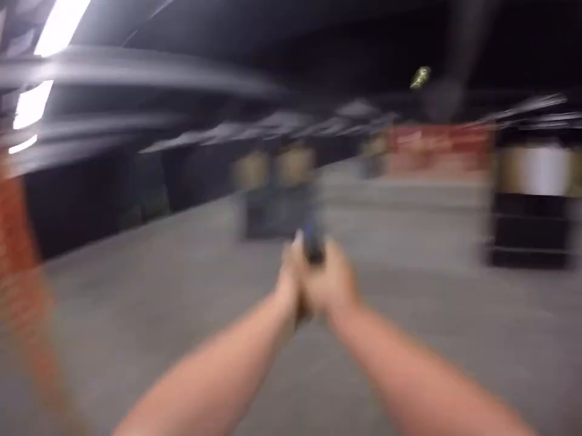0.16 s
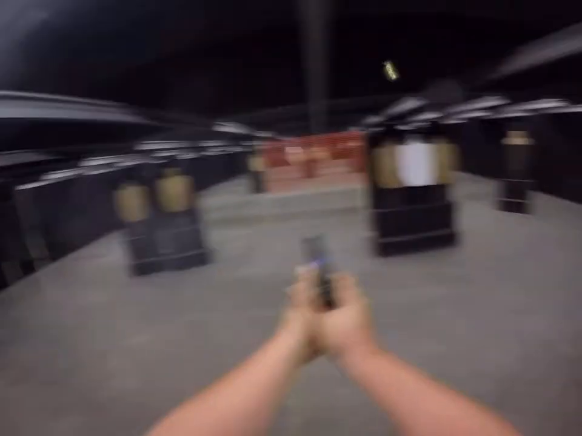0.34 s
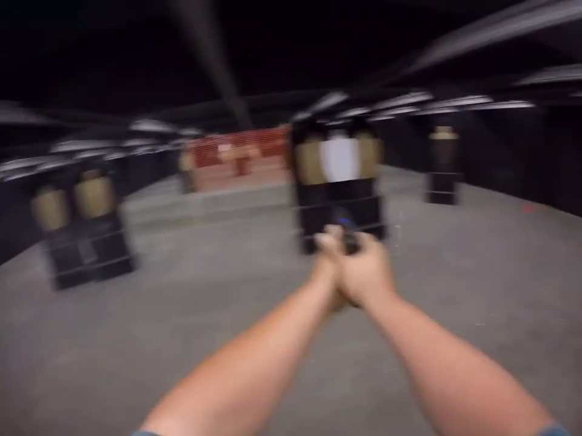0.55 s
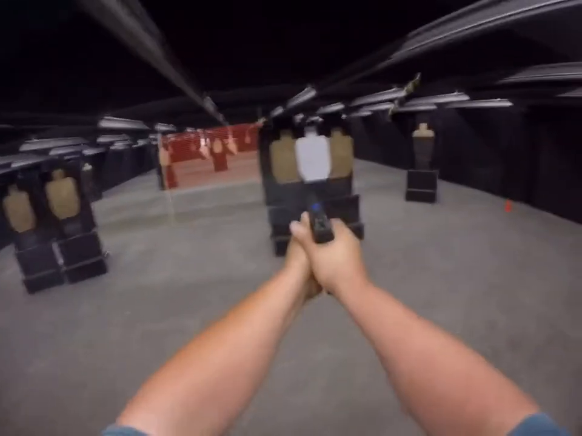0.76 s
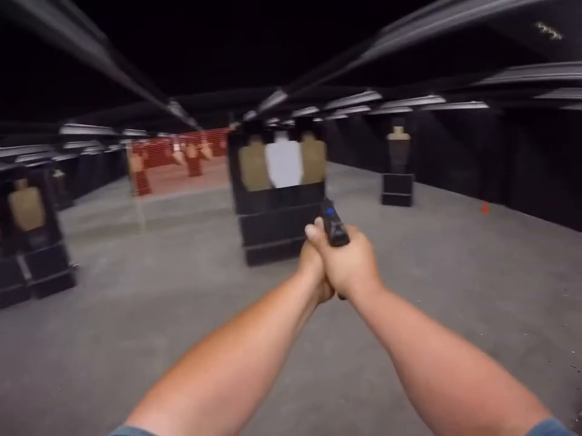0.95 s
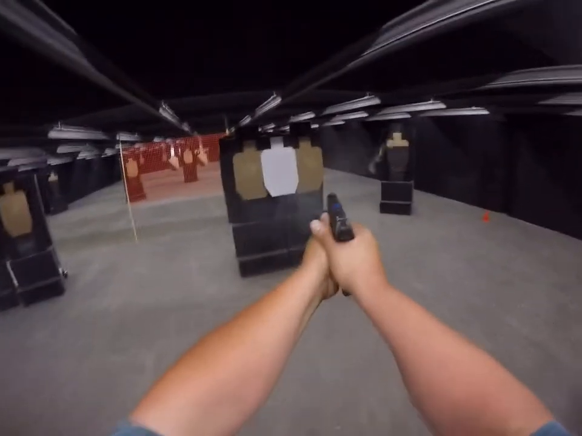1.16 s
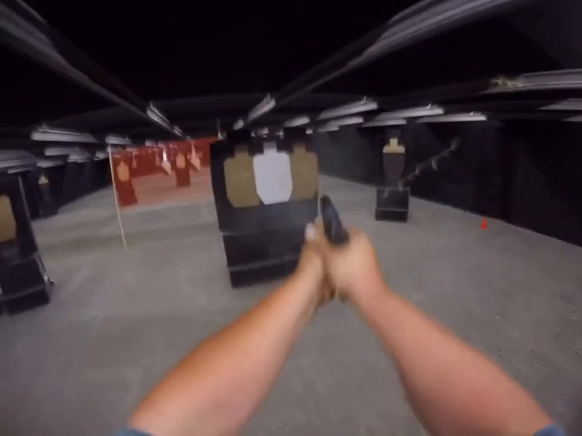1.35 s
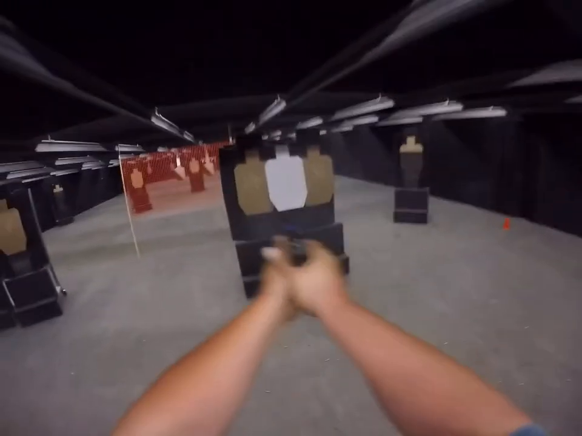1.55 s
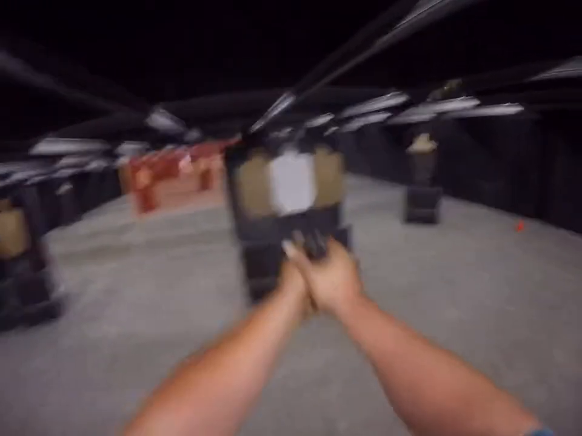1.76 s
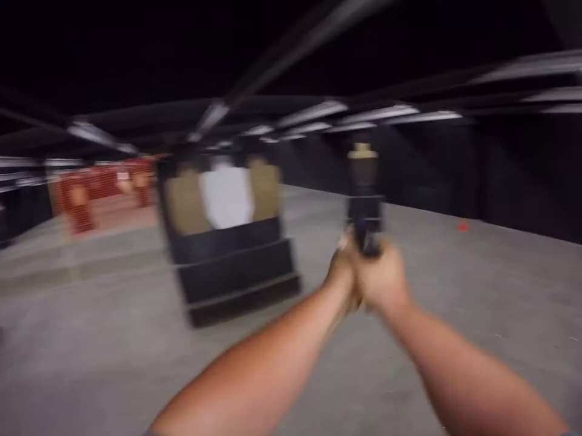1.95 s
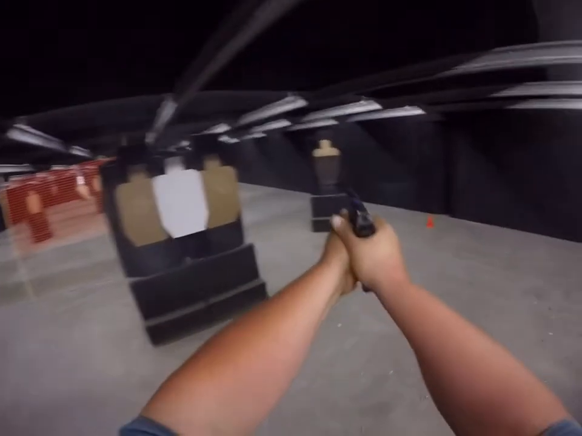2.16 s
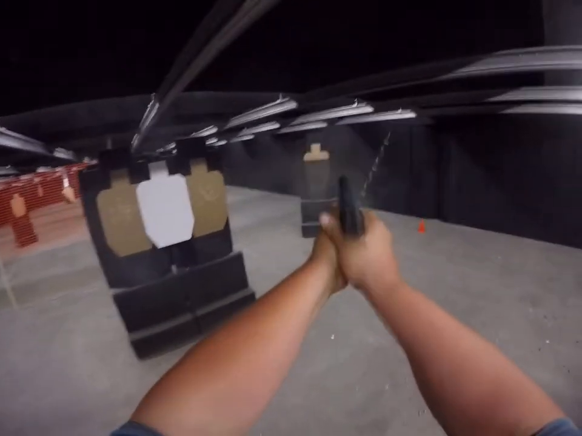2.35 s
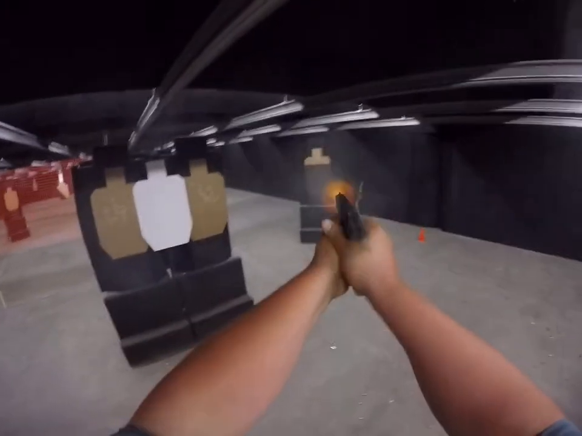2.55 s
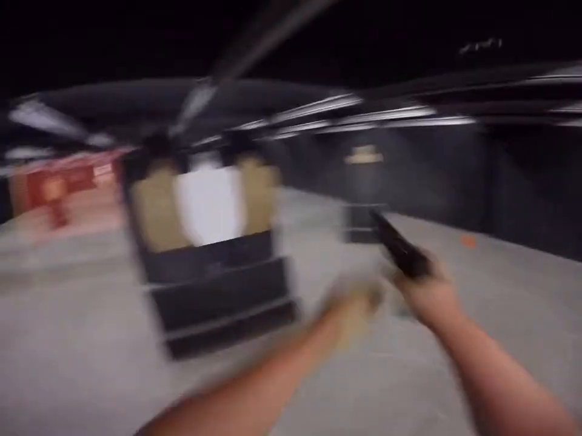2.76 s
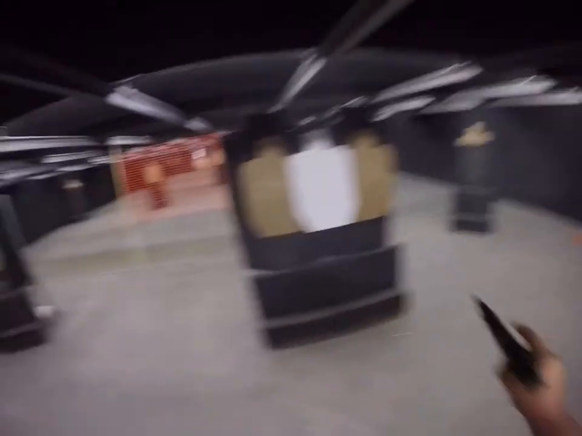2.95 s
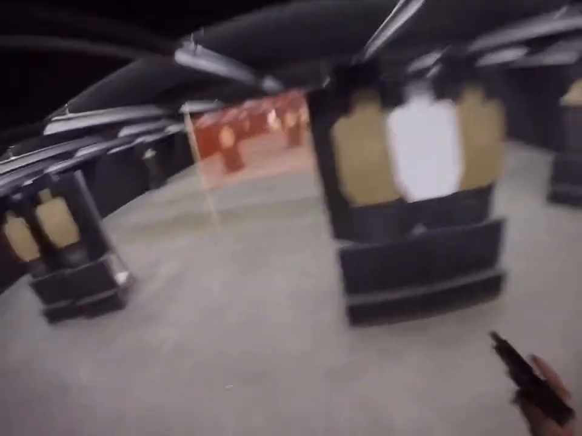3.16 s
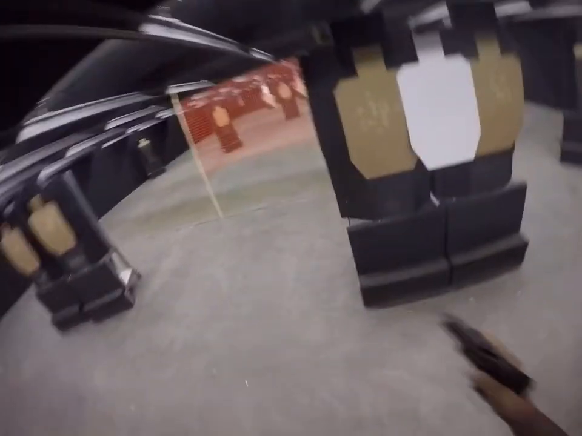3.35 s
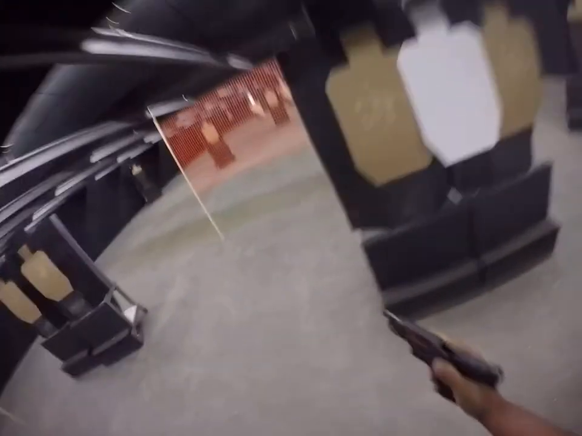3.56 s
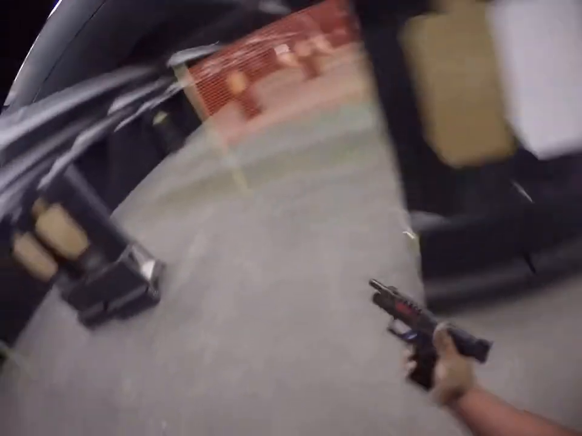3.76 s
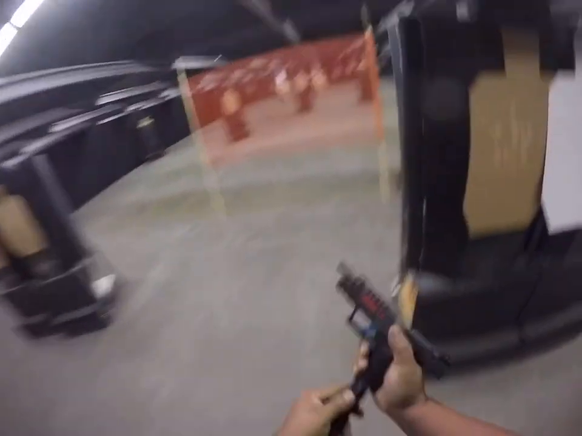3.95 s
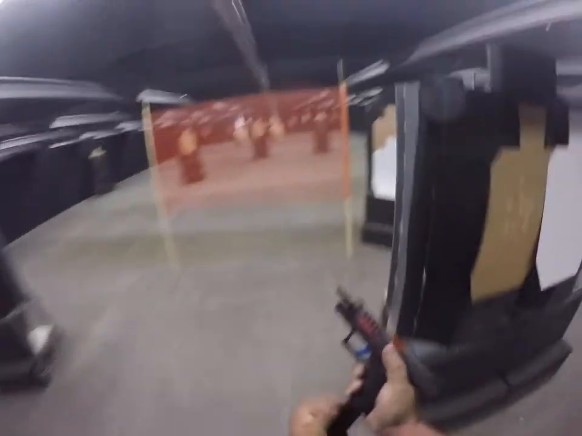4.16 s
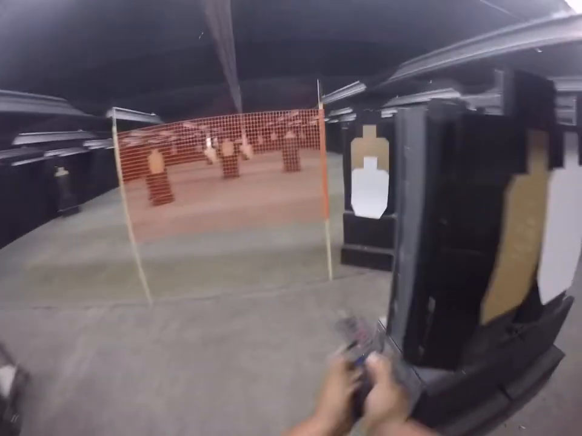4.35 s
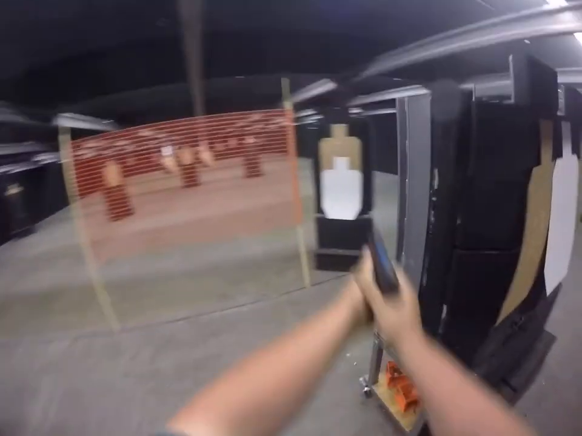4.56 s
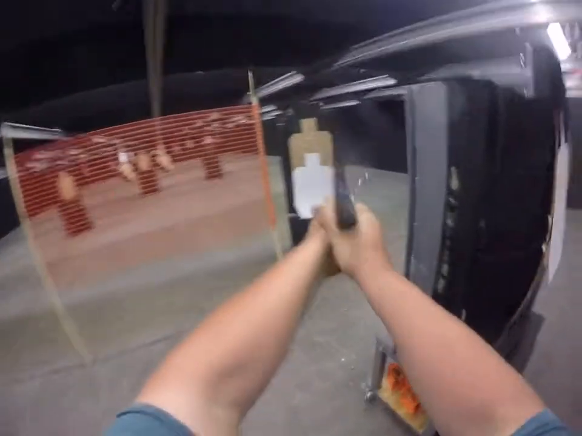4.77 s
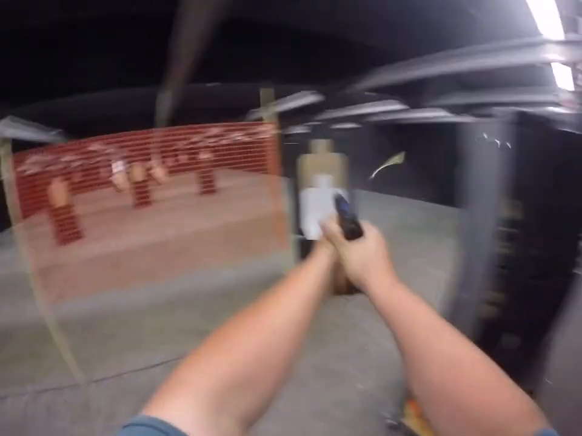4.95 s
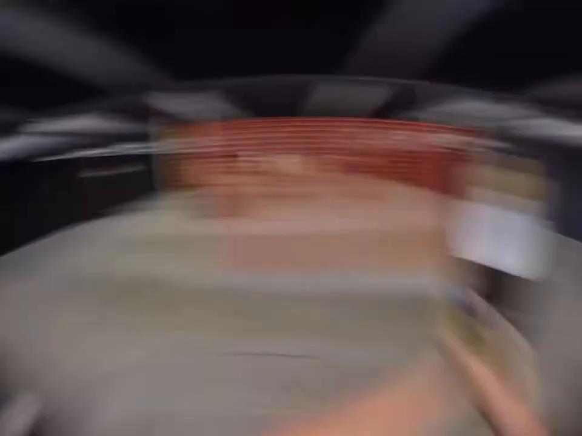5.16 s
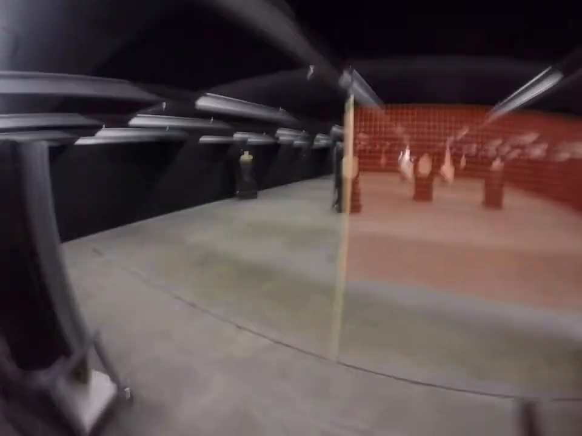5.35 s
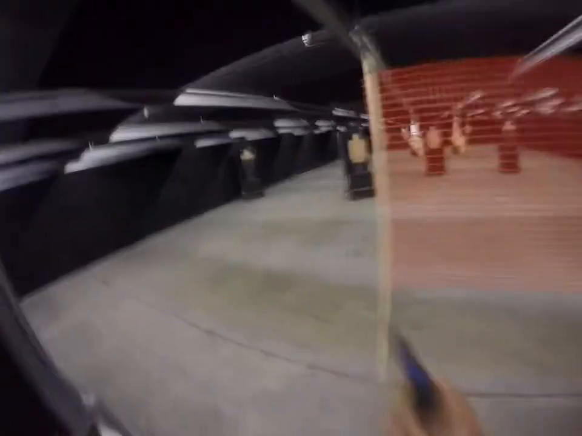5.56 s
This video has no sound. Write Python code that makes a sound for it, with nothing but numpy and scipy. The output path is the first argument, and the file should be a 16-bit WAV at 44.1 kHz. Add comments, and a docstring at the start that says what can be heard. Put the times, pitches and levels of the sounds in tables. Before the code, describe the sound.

Nine overloaded pistol shots crack in uneven strings through a concrete indoor range, broken by a quick clacking magazine change.

```python
"""A pistol is fired in quick strings in an indoor range, heard from a camera worn by the shooter.
Each blast is a noise crack, ringing housing modes and a low thud; decaying noise bands make the concrete hall.
The reload is noise blows and scrapes through steel resonances: a magazine drops and bounces, a new one goes in,
the slide closes. Spent brass rings in paired modes; filtered noise makes ventilation and buffeting.
The microphone overloads and flattens the peaks."""
import sys
import numpy as np
from scipy import signal
from scipy.fft import rfft, irfft, next_fast_len
from scipy.io import wavfile

SR = 44100
rng = np.random.default_rng(int(sys.argv[2]) if len(sys.argv) > 2 else 0)


def waveform_to_disk(signal):
    """Save audio, clipped to [-1, 1], as 16-bit WAV at the path in sys.argv[1]."""
    frames = np.transpose(np.atleast_2d(signal))
    scaled = np.clip(frames, -1, 1) * 32767
    samples = np.round(scaled).astype(np.int16)
    wavfile.write(sys.argv[1], SR, samples)


N = 247401
TIME_S = np.arange(N) / SR
ONE_SECOND = TIME_S[:SR]

# Steel contacts of trigger, magazine and slide.
# Each row: start in seconds, relative snap level in dB, edge click relative to the snap in dB.
CONTACTS = [(2.317, -32, -36), (4.044, -36, -21), (4.073, -41, -26), (4.084, -42.5, -20.5),
            (4.112, -35.5, -12), (4.157, -43, -28), (4.178, -46.5, -19), (4.306, -30.5, -20),
            (4.326, -2.5, -31.5), (4.4, -28, -17), (4.411, -21, -20), (4.418, -19, -21), (4.4257, -6, -17),
            (4.43, -16.5, -10.5), (5.594, -48, -34.5)]
# Decay of the hall after a shot. Each row: frequency in Hz, nominal t60 in seconds.
HALL_T60 = [(60, 0.73), (180, 1.12), (350, 0.85), (700, 0.77), (1200, 0.99), (2700, 0.86), (5000, 0.75),
            (8000, 0.46), (14000, 0.13)]


def from_db(db):
    """Decibels to amplitude gain."""
    return 10 ** (np.asarray(db) / 20)


def rms_one(x):
    """Scale to unit rms."""
    return x / np.sqrt(np.mean(x ** 2) + 1e-20)


def at_hz(points, hz):
    """Interpolate a (Hz, value) table on a log-frequency axis."""
    known_hz, values = np.transpose(points)
    return np.interp(np.log(np.maximum(hz, 1)), np.log(known_hz), values)


def noise(colour):
    """Gaussian noise of unit rms, shaped to the given spectrum."""
    size = next_fast_len(N)
    hz = np.linspace(0, SR / 2, size // 2 + 1)
    spectrum = rfft(rng.standard_normal(size)) * from_db(at_hz(colour, hz))
    return rms_one(irfft(spectrum, size)[:N])


def split_bands(x):
    """Split a sound into overlapping bands that add up to it: (centre Hz, band)."""
    size = next_fast_len(N)
    centres_hz = np.geomspace(60, 15000, 11)
    hz = np.linspace(0, SR / 2, size // 2 + 1)
    spectrum = rfft(x, size)
    for centre_hz in centres_hz:
        triangle = np.column_stack([centres_hz, centres_hz == centre_hz])
        yield centre_hz, irfft(spectrum * at_hz(triangle, hz), size)[:N]


def dying(times_s, level_db, t60_s):
    """Envelope of hits whose energies add and decay exponentially; hits before zero enter partly decayed."""
    level_db = level_db + 60 * np.minimum(times_s, 0) / t60_s
    samples = np.clip(np.round(times_s * SR).astype(int), 0, N - 1)
    energy = np.zeros(N)
    np.add.at(energy, samples, from_db(level_db) ** 2)
    energy_decay = from_db(-60 / (t60_s * SR)) ** 2
    return np.sqrt(signal.lfilter([1], [1, -energy_decay], energy + 1e-22))


def add(out, start_s, sound):
    """Mix a sound in at a time."""
    start = int(np.clip(round(start_s * SR), 0, N - 1))
    out[start:start + len(sound)] += sound[:N - start]


def fade(t60_s):
    """One second of exponential decay."""
    return from_db(-60 * ONE_SECOND / t60_s)


def ring(hz, t60_s):
    """One struck mode: a decaying sine."""
    return np.sin(2 * np.pi * hz * ONE_SECOND) * fade(t60_s)


def resonate(x, hz, width_hz):
    """Two-pole resonance with roughly unit gain at its peak."""
    radius = np.exp(-np.pi * width_hz / SR)
    zeros = np.array([1, 0, -1]) * (1 - radius * radius) / 2
    poles = [1, -2 * radius * np.cos(2 * np.pi * hz / SR), radius * radius]
    return signal.lfilter(zeros, poles, x + 1e-18)


def body(force, resonances):
    """Solid object driven by a force: parallel resonances of alternating sign."""
    return sum((-1) ** k * from_db(db) * resonate(force, hz, width_hz)
               for k, (hz, width_hz, db) in enumerate(resonances))


def flutter(depth_db, rate_hz):
    """Gain that wanders at random in dB, with rate_hz new targets a second."""
    targets = rng.standard_normal(N)
    return from_db(depth_db * np.interp(TIME_S * rate_hz, np.arange(N), targets))


def hall(times_s, level_db, colour, decay, t60_share):
    """Diffuse reverberation: coloured noise whose bands each decay at their own rate."""
    return sum(band * dying(times_s, level_db, t60_share * at_hz(decay, hz))
               for hz, band in split_bands(noise(colour)))


def air(buffet_db, floor_db):
    """Steady ventilation noise, and lumpy low buffeting as air and clothes move past the camera."""
    # Each row: time in seconds, relative buffeting level in dB.
    motion = [(0, -49.5), (2.901, -47), (3.6, -53.5), (4.03, -39), (4.14, -41.5), (4.7, -36.5), (5.35, -48),
              (5.6, -42.5)]
    # Buffeting spectrum. Each row: frequency in Hz, relative level in dB.
    buffet_colour = [(20, -4.5), (65, -1), (100, -4.5), (170, -19), (350, -15), (520, -26.5), (900, -48.5),
                     (2000, -67.5)]
    # Ventilation spectrum. Each row: frequency in Hz, relative level in dB.
    floor_colour = [(25, 2), (75, 1.5), (150, -8.5), (330, -13.5), (600, -32.5), (1000, -31), (1700, -36.5),
                    (2800, -39), (5200, -42.5), (8300, -48.5), (15000, -62.5)]
    s, motion_db = np.transpose(motion)
    level = from_db(np.interp(TIME_S, s, motion_db) + buffet_db)
    buffeting = level * noise(buffet_colour) * flutter(depth_db=-0.5, rate_hz=7.7)
    ventilation = from_db(-59.5 + floor_db) * noise(floor_colour)
    return buffeting + ventilation


def brass(t60_s, split_hz, tick_db, hall_width_hz):
    """A slightly oval case ticks, rings in a close pair of high modes and hops once; the hall blurs its ring."""
    # Spent cases landing on concrete. Each row: start in seconds, relative level in dB, ring in Hz.
    cases = [(0.55, -66, 10900), (1.07, -74, 11000), (2.22, -72.5, 11300), (3.031, -68, 11400),
             (3.308, -62.5, 10850), (3.46, -68, 11550), (3.869, -58, 10880), (4.156, -57, 10720)]
    hop_s, hop_loss_db = .17, 11.0
    hall_db, hall_t60_s = -12.0, .6
    out = np.zeros(N)
    for s, level_db, hz in cases:
        second_hz = hz + split_hz * rng.uniform(.5, 2)
        pair = ring(hz, t60_s) + ring(second_hz, t60_s) / 2
        tick = from_db(tick_db) * rng.standard_normal(SR) * fade(0.028)
        narrow = resonate(rng.standard_normal(SR), hz, hall_width_hz)
        blur = rms_one(resonate(narrow, hz, hall_width_hz))
        landing = pair + tick + from_db(hall_db) * blur * fade(hall_t60_s)
        add(out, s, from_db(level_db) * landing)
        add(out, s + hop_s, from_db(level_db - hop_loss_db) * landing)
    return out


def magazine_bounces(count):
    """Empty magazine on concrete: flights shorten, landings soften.

    Each row: start in seconds, snap dB, edge dB, rattle t60 in seconds, hall dB."""
    first_flight_s, restitution, bounce_loss_db = .3076, .546, 5.5
    edge_db, rattle_t60_s, hall_db = -27, 0.12, -12.5
    s, rows = 3.3904, []
    for k in range(count):
        level_db = -28.0 - bounce_loss_db * k
        rows.append((s, level_db, edge_db, rattle_t60_s, level_db + hall_db))
        s += first_flight_s * restitution ** k
    return rows


def hand_contacts():
    """Contacts in the shooter's hands, close and dry; rows as in magazine_bounces."""
    rattle_t60_s = 0.032
    hall_db, hall_follows = -31.5, 0.72  # hall level for a 0 dB snap, share of the snap level it follows
    return [(s, db, edge_db, rattle_t60_s, hall_db + hall_follows * db) for s, db, edge_db in CONTACTS]


def grip_thumps():
    """Each hand contact also knocks the polymer grip from inside, exciting its low resonances."""
    # Each row: frequency in Hz, width in Hz, relative level in dB.
    grip = [(340, 120, 0.5), (590, 130, -7)]
    level_db, follows = -19, 0.6  # level for a 0 dB snap, share of the snap level it follows
    s, snap_db, _ = np.transpose(CONTACTS)
    return body(dying(s, level_db + follows * snap_db, t60_s=0.0028), grip)


def scraping(ticks_per_s, tick_db, spread_db):
    """Steel on steel: a light rub that catches in uneven ticks; each stroke holds, then dies away."""
    # The magazine finds the well and rides in, then the slide runs.
    # Each row: start in seconds, length in seconds, relative level in dB.
    scrapes = [(3.916, 0.1, -63), (4.155, 0.03, -52), (4.25, 0.11, -59), (4.40, 0.037, -41)]
    release_db_per_s = 446.5
    tick_gain = from_db(tick_db + spread_db * rng.uniform(-1, 1, N))
    catches = (rng.random(N) < ticks_per_s / SR) * tick_gain
    ticks = signal.lfilter([1], [1, -.975], catches + 1e-18)
    strokes = np.zeros(N)
    for s, length_s, db in scrapes:
        released_s = np.clip(TIME_S - s - length_s, 0, 1)
        strokes += (TIME_S >= s) * from_db(db - release_db_per_s * released_s)
    return strokes * (from_db(1.5) + ticks)


def reloading(gain_db, snap_t60_s, rattle_db, grain_db, rub_hiss_db, thump_db):
    """Contacts snap and rattle through the steel's resonances, with grip thumps; the hall answers."""
    # Pistol frame and slide. Each row: frequency in Hz, width in Hz, relative level in dB.
    steel_modes = [(2650, 190, -2.5), (3920, 290, 0.5), (4800, 380, 3.5), (5360, 260, 5), (6480, 440, -4.5),
                   (8570, 500, -18.5), (11500, 500, -18.5), (13300, 460, -21.5), (14950, 320, -14.5)]
    # Colour of the reload in the hall. Each row: frequency in Hz, relative level in dB.
    room_colour = [(100, -12), (400, -1.5), (1000, -21), (2050, -11), (2800, -5), (3300, -11.5),
                   (4200, -0.5), (5300, -2.5), (6400, -3), (8500, -14), (15000, -10)]
    # Decay of the reload in the hall. Each row: frequency in Hz, nominal t60 in seconds.
    room_t60 = [(400, 0.44), (2700, .85), (5200, 0.74), (8500, .5), (14000, 0.45)]
    s, snap_db, edge_db, rattle_t60_s, hall_db = np.transpose(hand_contacts() + magazine_bounces(count=3))
    force = scraping(ticks_per_s=93, tick_db=16.0, spread_db=3.5)
    edges = from_db(rub_hiss_db) * force
    for at_s, level_db, t60_s, bright_db in zip(s, snap_db, rattle_t60_s, edge_db):
        rattle = from_db(rattle_db) * fade(max(t60_s, .003))
        blow = from_db(level_db) * (fade(snap_t60_s) + rattle)
        add(force, at_s, blow)
        # sharp edges radiate a broadband click of their own
        add(edges, at_s, from_db(bright_db) * blow)
    uneven = from_db(grain_db * rng.standard_normal(N))
    grains = rms_one(rng.standard_normal(N) * uneven)
    steel = from_db(gain_db) * (body(force * grains, steel_modes) + edges * grains)
    thumps = from_db(thump_db) * grip_thumps()
    return steel + thumps + hall(s + 0.0066, hall_db - 4.5, room_colour, room_t60, t60_share=0.9)


def tail(s, level_db):
    """The hall's long decay, with a few narrow resonances ringing out of it."""
    # Late hall spectrum. Each row: frequency in Hz, relative level in dB.
    late_colour = [(30, -24.5), (85, -7), (150, -7), (210, 0), (400, 5), (620, -8.5), (850, -18.5),
                   (1150, -22), (1500, -31), (2100, -30.5), (2700, -24), (3300, -30), (5000, -25.5),
                   (9000, -39), (15000, -29.5)]
    # Each row: frequency in Hz, width in Hz, relative level in dB, t60 in seconds.
    hall_modes = [(87, 6.1, -36.5, 3.3), (134, 6.2, -36, 2.4), (204.1, 6, -20.5, 1.33), (1133, 51, -34, 1),
                  (2550, 93, -33.5, 0.51)]
    ringing = np.zeros(N)
    for hz, width_hz, db, t60_s in hall_modes:
        mode = rms_one(resonate(rng.standard_normal(N), hz, width_hz))
        ringing += mode * dying(s, level_db + db, t60_s)
    diffuse = hall(s, level_db - 15.5, late_colour, HALL_T60, t60_share=0.99)
    return diffuse + from_db(-7.0) * ringing


def thuds(s, thud_db, thud_hz, t60_s):
    """The slow push and pull of the muzzle gas: a low decaying sine."""
    out = np.zeros(N)
    for at_s, level_db in zip(s, thud_db):
        add(out, at_s, from_db(level_db) * ring(thud_hz, t60_s))
    return out


def booms(s, boom_db, pitch, lag_s, swell_s, hurry_s, settle_s):
    """The pressure wave throws the camera housing into a few large swings, the first ones quickest."""
    # Each row: frequency in Hz, relative level in dB, t60 in seconds.
    housing = [(147, -8.5, 0.014), (221, 10, 0.031), (303.5, -2.5, 0.078), (400, -1.5, 0.017),
               (787, -21.5, 0.12), (1057, -8, 0.035), (1700, -23, 0.034), (2890, -11.5, 0.014),
               (3670, -8, 0.011), (6400, -22, 0.037), (7620, -17, 0.0078)]
    out = np.zeros(N)
    swell = 1 - np.exp(-ONE_SECOND / swell_s)
    clock_s = ONE_SECOND + hurry_s * (1 - np.exp(-ONE_SECOND / settle_s))
    for at_s, level_db, factor in zip(s, boom_db, pitch):
        for hz, db, t60_s in housing:
            if hz < 500:  # the whole shell swings slowly
                mode = swell * np.sin(2 * np.pi * hz * factor * clock_s) * fade(t60_s)
            else:  # small panels simply ring
                mode = ring(hz, t60_s)
            add(out, at_s + lag_s, from_db(level_db + db) * mode)
    return out


def cracks(s, crack_db, gain_db, echo_gain_db, t60_s, echo_t60_s, path_spread, wall_cut_hz):
    """The brief shock front, then duller scattered reflections, whose paths change as the shooter moves."""
    # Crack spectrum. Each row: frequency in Hz, relative level in dB.
    crack_colour = [(300, 13), (1000, 5), (1900, -4.5), (3000, 7), (4500, 3.5), (6500, -2), (9000, -21.5),
                    (12000, -8), (15000, -3)]
    # Floor, ceiling and target stands. Each row: nominal delay in seconds, relative level in dB.
    reflections = [(.005, -9), (.0085, -19.5), (0.0129, -11), (0.022, -27)]
    front = from_db(gain_db) * dying(s, crack_db, t60_s) * noise(crack_colour)
    power = 0
    for delay_s, echo_db in reflections:
        paths_s = delay_s * (1 + path_spread * rng.uniform(-0.25, 1, len(s)))
        power = power + dying(s + paths_s, crack_db + echo_db, echo_t60_s) ** 2
    scattered = np.sqrt(power) * noise(crack_colour) * flutter(depth_db=1.5, rate_hz=1100)
    walls = signal.butter(1, min(wall_cut_hz, .45 * SR), fs=SR, output="sos")
    return front + from_db(echo_gain_db) * signal.sosfilt(walls, scattered)


def shots():
    """Crack, boom and thud, a lumpy cloud of near reflections and the long tail of the hall."""
    # Each row: start in seconds, relative blast level in dB, boom pitch factor,
    # relative pressure thud level in dB, relative hall tail level in dB.
    shot_rows = [(0.076, 0, 0.95, -14, 2.5), (0.7009, 1, 1, -21.5, 2.5), (1.1501, 2.5, 1.14, -5.5, 0.5),
                 (1.3371, -2.5, 0.8, -12, -0.5), (1.6837, 0.5, 0.89, -3, 2), (2.3551, 4.5, 1.03, -3, 0.5),
                 (2.5925, 1, 1.2, -1.5, -1.5), (4.7793, 7.5, 1.1, 1, -0.5), (4.9430, 2, 1.01, -6.5, -9.5)]
    # A shot fired just before the start: time in seconds, relative hall tail level in dB.
    earlier_shot = (-0.31, 1.5)
    # Near reflection spectrum. Each row: frequency in Hz, relative level in dB.
    early_colour = [(30, -9.5), (80, -9), (150, -11.5), (220, 5), (420, 8), (620, -5.5), (850, -18),
                    (1100, -12.5), (1600, -29), (5000, -21), (9000, -31.5), (15000, -35)]
    near_db, near_follows = -5, 0.61  # level for a 0 dB blast, share of the blast level it follows
    s, blast_db, pitch, thud_db, late_db = np.transpose(shot_rows)
    crack = cracks(s, blast_db, gain_db=1.5, echo_gain_db=-3.0, t60_s=0.0076, echo_t60_s=0.023,
                   path_spread=0.13, wall_cut_hz=9400)
    boom = booms(s, blast_db + 0.3, pitch, lag_s=.0011, swell_s=0.0023, hurry_s=0.00098, settle_s=0.0015)
    thud = thuds(s + 0.0076, thud_db, thud_hz=44.0, t60_s=0.058)
    near = hall(s + 0.0054, near_db + near_follows * blast_db, early_colour, HALL_T60, t60_share=0.24)
    near = near * flutter(depth_db=3.0, rate_hz=320)
    far = tail(np.append(s, earlier_shot[0]) + 0.028, np.append(late_db, earlier_shot[1]))
    return crack + boom + thud + near + far


def scene():
    """All sources add at the single microphone."""
    background = air(buffet_db=-2.5, floor_db=0.0)
    cases = brass(t60_s=0.19, split_hz=25, tick_db=1.5, hall_width_hz=200)
    reload = reloading(gain_db=5.0, snap_t60_s=0.0079, rattle_db=-5.5, grain_db=0.5,
                       rub_hiss_db=-22.5, thump_db=9.0)
    return (background + cases + reload + shots())[None]


def record(dry):
    """The overloaded microphone flattens the peaks; a steep low-pass cuts the top."""
    limit, stopband_hz = .96, 16150
    flattened = dry / (1 + (dry / limit) ** 4) ** (1 / 4)
    return signal.sosfilt(signal.cheby2(14, 70, stopband_hz, fs=SR, output="sos"), flattened)


dry = scene()
out = record(dry)
waveform_to_disk(out)
```